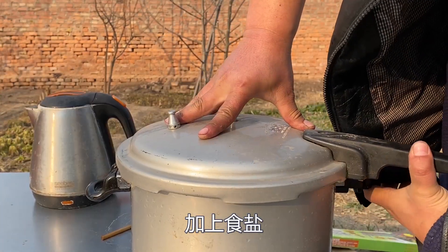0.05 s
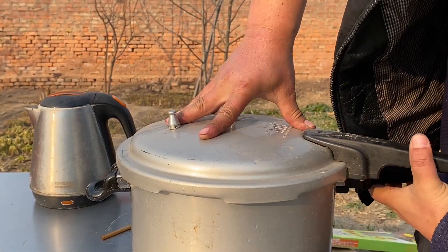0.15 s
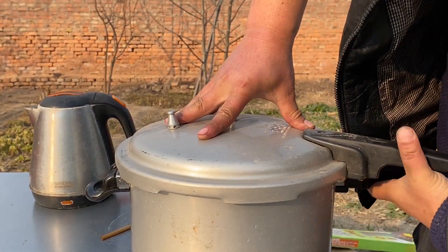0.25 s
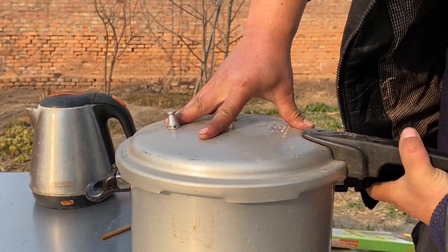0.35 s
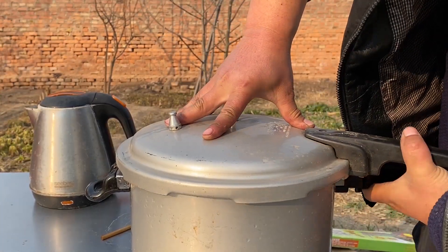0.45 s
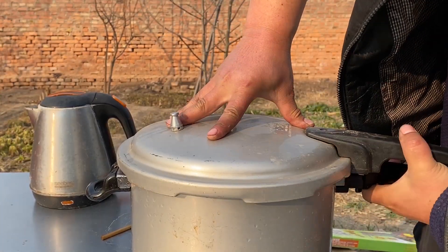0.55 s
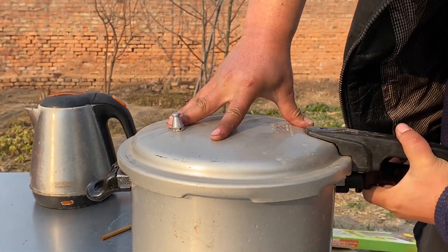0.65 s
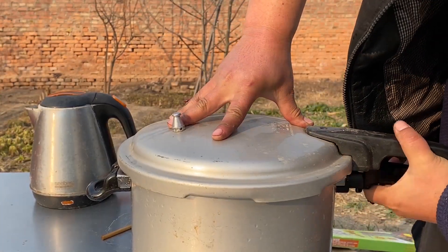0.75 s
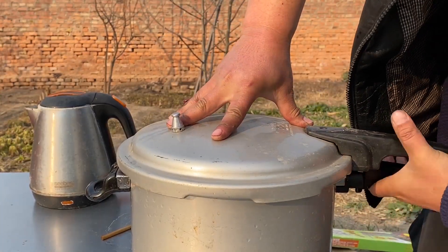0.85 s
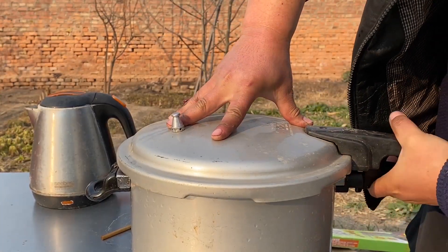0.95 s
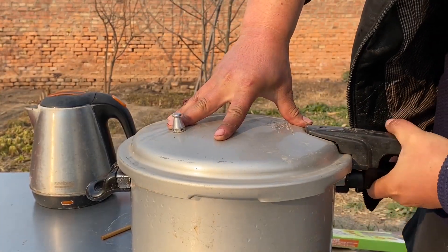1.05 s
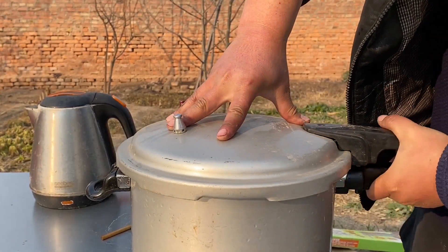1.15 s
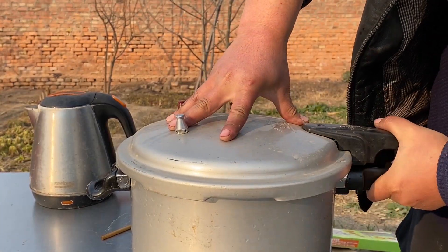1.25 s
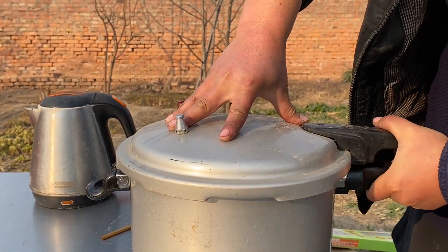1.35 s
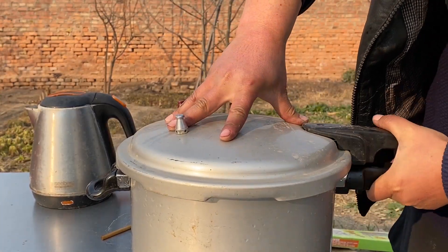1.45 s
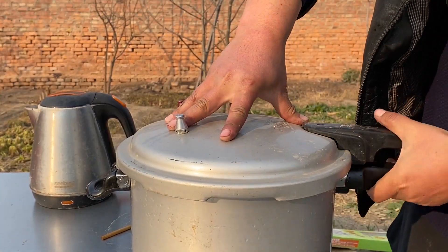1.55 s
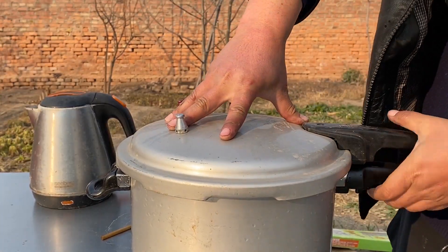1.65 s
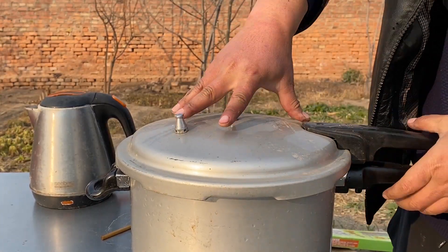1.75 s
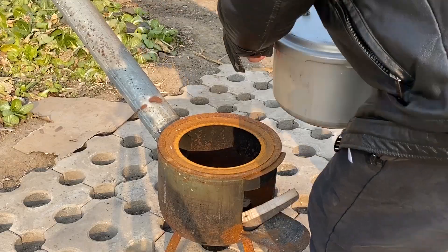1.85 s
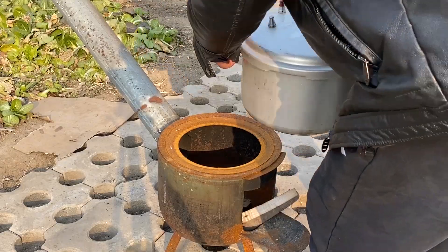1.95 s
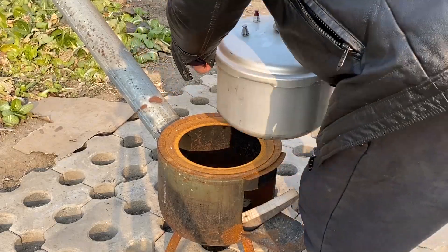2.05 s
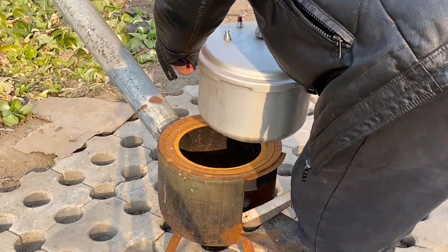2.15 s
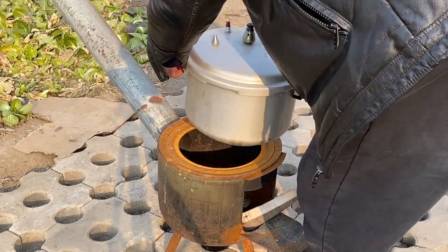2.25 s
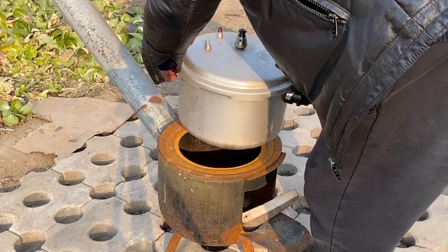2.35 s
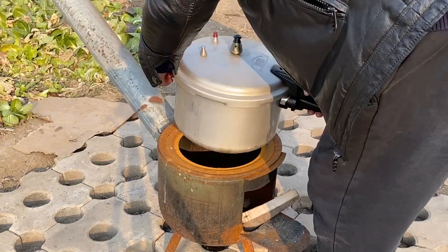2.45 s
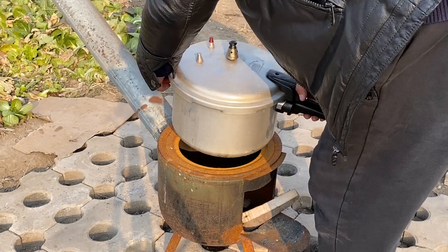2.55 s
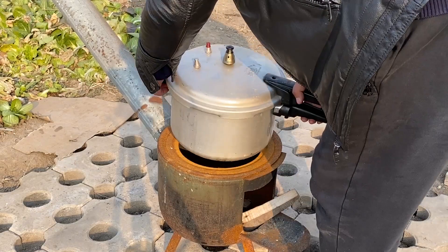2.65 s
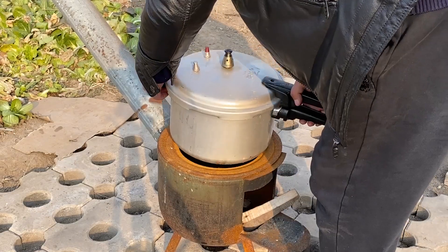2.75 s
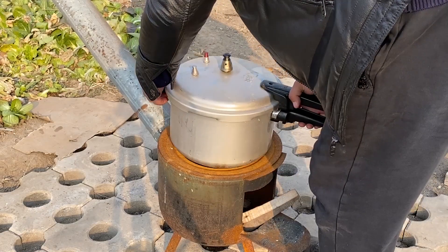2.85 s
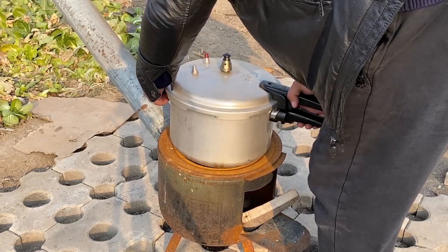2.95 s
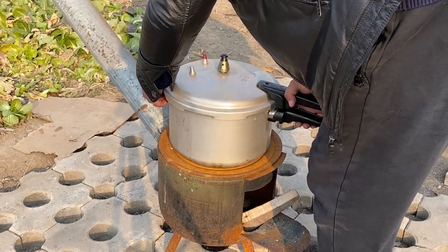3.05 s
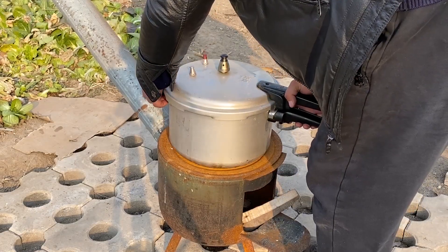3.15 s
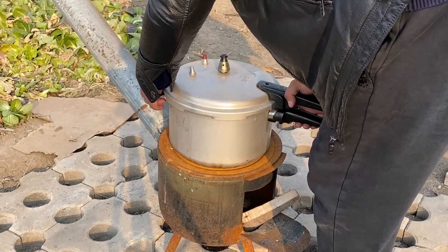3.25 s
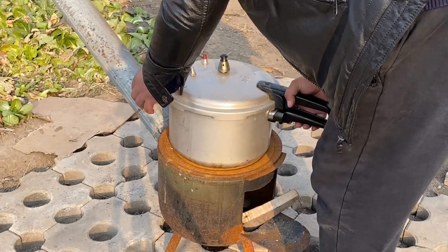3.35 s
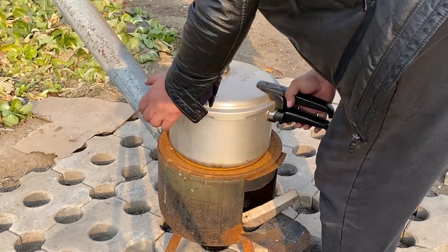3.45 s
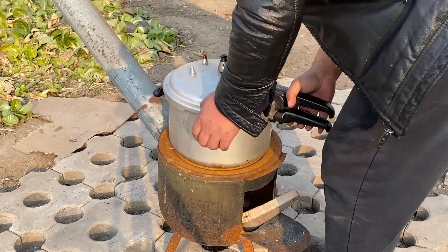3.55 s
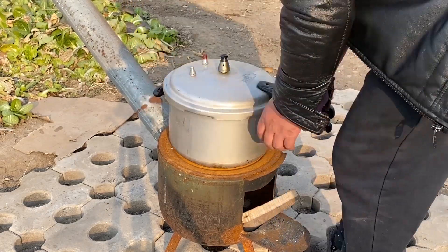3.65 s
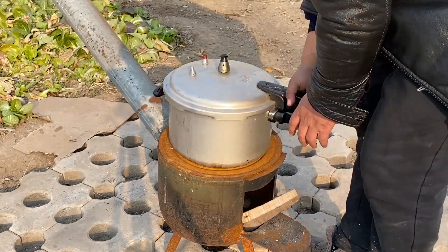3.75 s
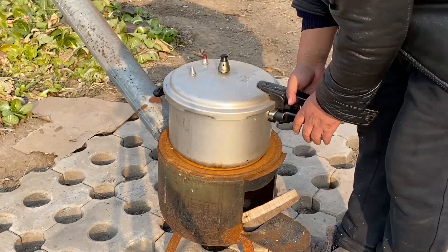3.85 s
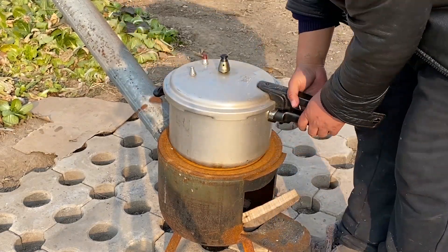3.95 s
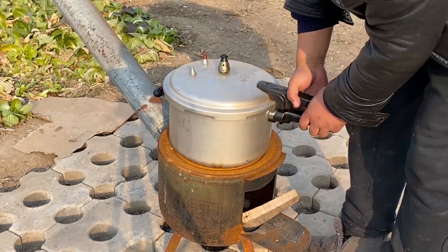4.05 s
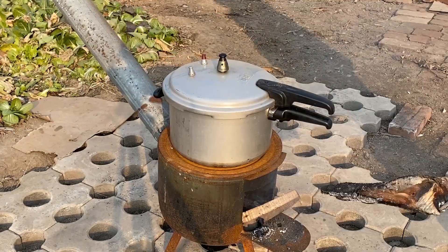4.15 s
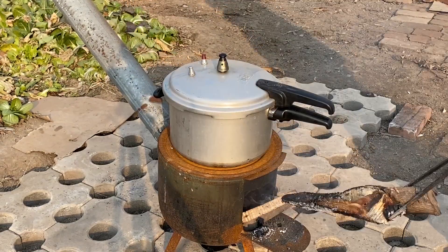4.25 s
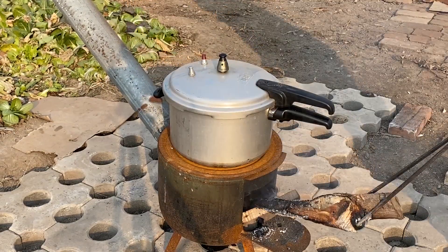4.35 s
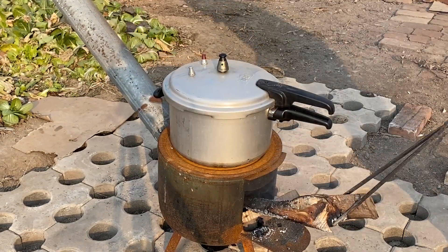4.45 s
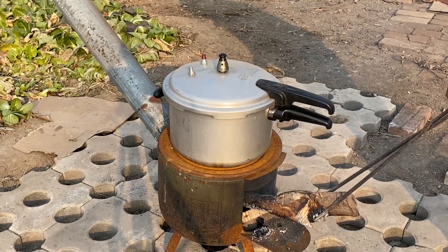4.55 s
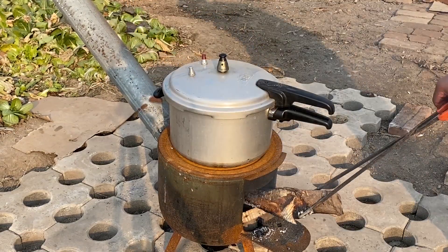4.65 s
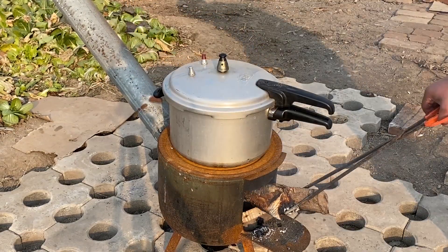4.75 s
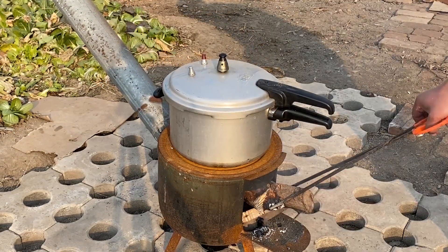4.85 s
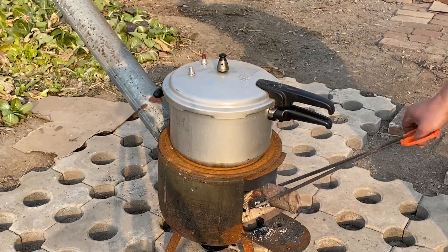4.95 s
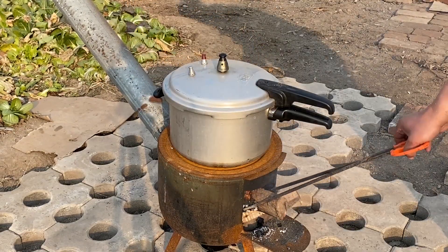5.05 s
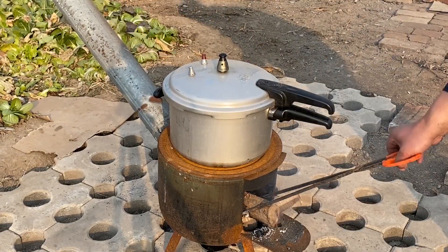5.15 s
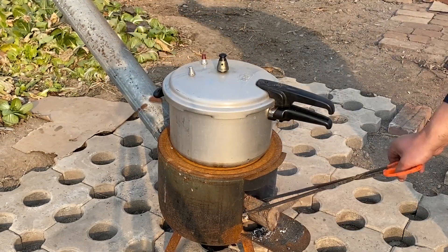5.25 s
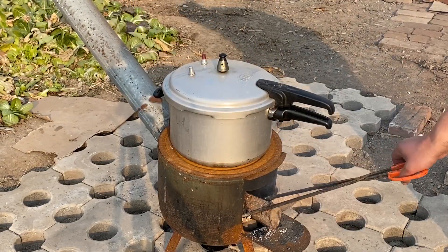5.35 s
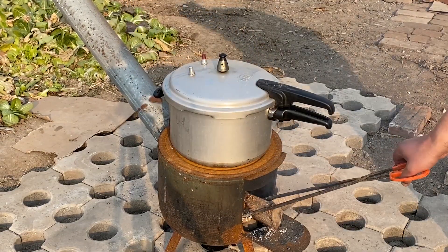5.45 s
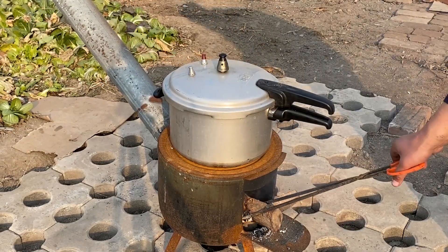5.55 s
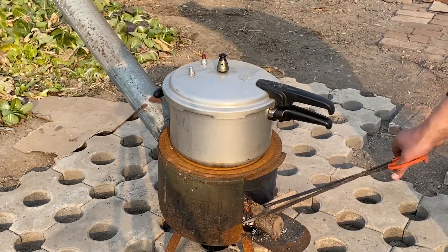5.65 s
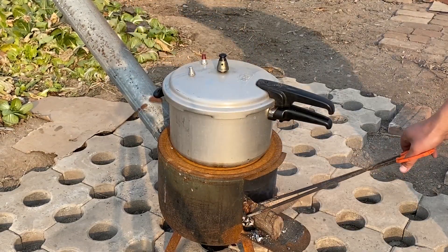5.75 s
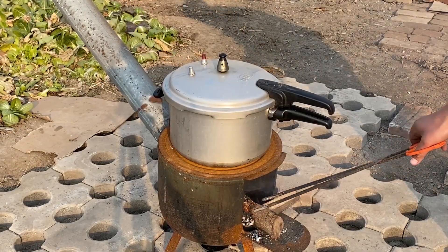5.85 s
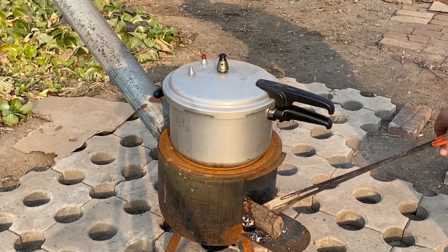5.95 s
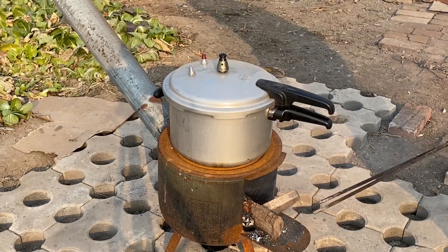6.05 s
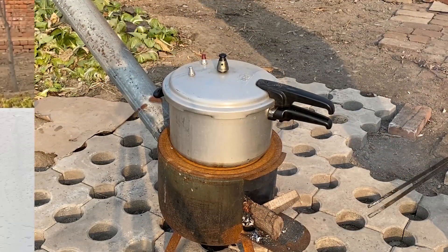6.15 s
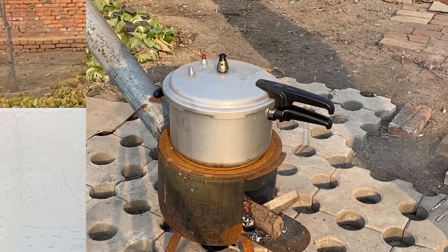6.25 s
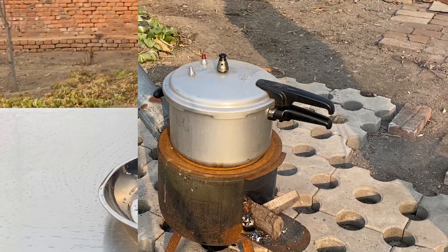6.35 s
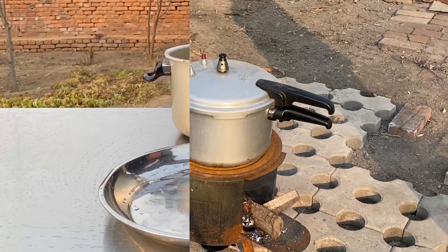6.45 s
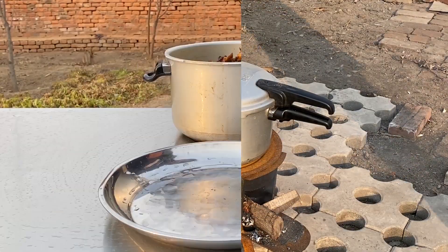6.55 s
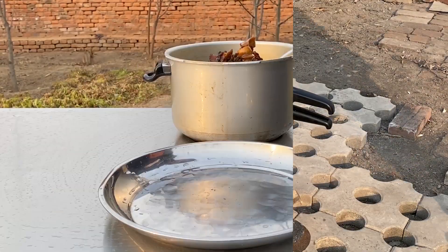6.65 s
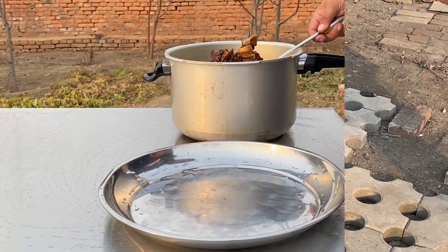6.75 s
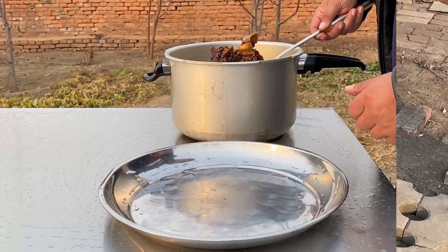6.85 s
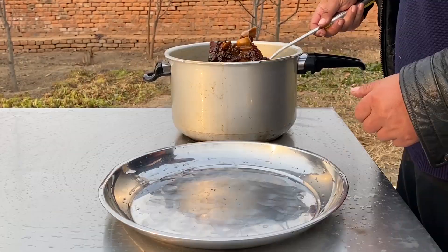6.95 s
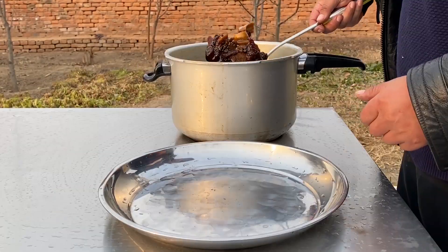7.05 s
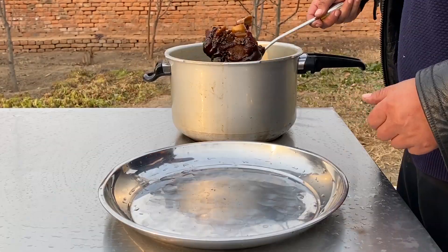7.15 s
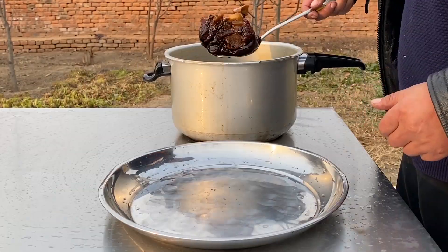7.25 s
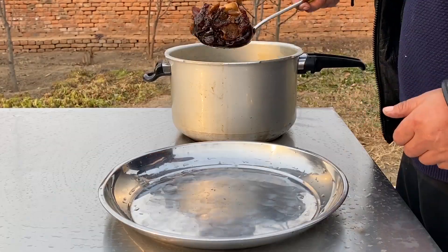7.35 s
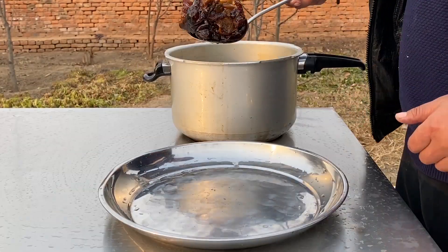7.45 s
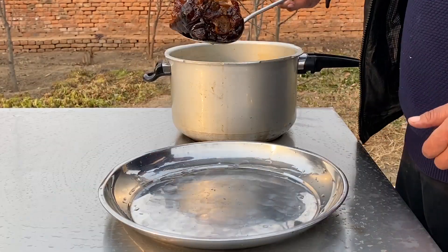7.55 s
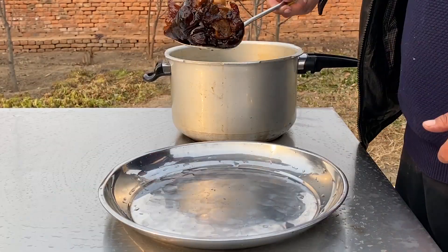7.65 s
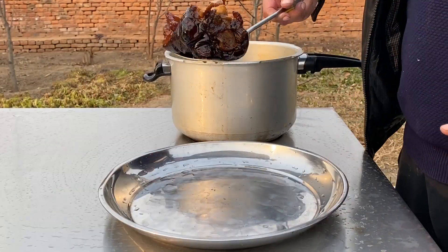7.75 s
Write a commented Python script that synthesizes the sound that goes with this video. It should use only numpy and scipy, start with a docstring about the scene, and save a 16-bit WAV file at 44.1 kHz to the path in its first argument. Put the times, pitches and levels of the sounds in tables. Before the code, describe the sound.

In a quiet yard, a cooker lid clanks shut, a pot thuds onto a stove, tongs scrape and ping, and a spoon lightly brushes the rim.

```python
"""A yard in light wind: coloured noise for hum and rumble, under the rustle of hands, sleeves and jacket.
A hand-damped pressure cooker lid is twisted until it locks with a clank: noise crack, thump and ringing modes.
The pot is carried over paving and set on an iron stove: damped knocks, gritty scrapes and sliding squeaks.
Iron tongs poke wood into the fire with decaying pings; the yard hum drops and a spoon brushes the pot rim."""
import sys
import numpy as np
from scipy import signal
from scipy.fft import rfft, irfft, next_fast_len
from scipy.io import wavfile
from scipy.ndimage import uniform_filter1d, map_coordinates

SR = 44100
rng = np.random.default_rng(int(sys.argv[2]) if len(sys.argv) > 2 else 0)


def log_audio(samples):
    """Write samples as a 16-bit WAV file to the path given in sys.argv[1]."""
    # one column per channel
    frames = np.atleast_2d(samples).T
    # limit to full scale, then quantise
    limited = np.clip(frames, -1, 1)
    pcm = np.round(limited * 32767).astype(np.int16)
    wavfile.write(sys.argv[1], SR, pcm)


N = 343098  # samples

# share by which scrape speed and spoon resonances vary
DRIFT = 0.0318


def undb(db):
    """Decibels to amplitude."""
    return 10 ** (np.asarray(db) / 20)


def unit(x):
    """Scales x to RMS 1."""
    return x / np.sqrt(np.mean(x ** 2))


def lowpass(x, hz):
    """Second-order low-pass."""
    return signal.sosfilt(signal.butter(2, hz, fs=SR, output="sos"), x)


def curve(rows):
    """Columns of a table joined by straight lines, one value per sample."""
    start_s, *columns = np.transpose(rows)
    return [np.interp(np.arange(N) / SR, start_s, column) for column in columns]


def colour(x, points):
    """Shapes the spectrum of x with (Hz, dB) points on a log-frequency axis."""
    hz, db = np.transpose(points)
    size = next_fast_len(len(x))
    bin_hz = np.arange(1, size // 2 + 2) * SR / size
    gain = undb(np.interp(np.log(bin_hz), np.log(hz), db))
    return irfft(rfft(x, size) * gain, size)[:len(x)]


def band(x, hz, width_hz):
    """One resonance, its pitch kept below SR / 2.5."""
    return signal.lfilter(*signal.iirpeak(min(hz, SR / 2.5), hz / width_hz, SR), x)


def fade(t60_s, size):
    """Exponential decay of 60 dB in t60_s, at least 5 ms."""
    return np.exp(-np.log(1000) * np.arange(size) / SR / max(t60_s, .005))


def ring(modes, size, scatter_db=0.):
    """Decaying sines; every blow lands elsewhere and shares its energy anew."""
    t = np.arange(size) / SR
    luck = rng.standard_normal(len(modes))
    out = np.zeros(size)
    for (hz, db, t60_s), r in zip(modes, luck):
        out += undb(db + scatter_db * r) * fade(t60_s, size) * np.sin(2 * np.pi * hz * t)
    return out


def grit(size, spread_db):
    """Dense slips of uneven size, the largest ones bounded."""
    boost = np.minimum(rng.exponential(size=size), 5)
    return unit(rng.standard_normal(size) * undb(spread_db * boost))


def walk(rate_hz):
    """Random levels held 1 / rate_hz, smoothed twice; RMS 1."""
    k = int(SR / rate_hz)
    steps = np.repeat(rng.standard_normal(N // k + 1), k)
    return unit(uniform_filter1d(uniform_filter1d(steps, k), k)[:N])


def metal(x, lo_hz, hi_hz, count):
    """Many narrow resonances at loosely even pitches: what makes rubbed metal sound unlike hiss."""
    places = (np.arange(count) + rng.random(count)) / count
    pitches = lo_hz * (hi_hz / lo_hz) ** places
    return unit(sum(band(x, hz, .03 * hz) for hz in pitches))


def add(out, start_s, x):
    """Mixes x into out from start_s."""
    i = int(start_s * SR)
    out[i:i + len(x)] += x[:N - i]


# yard spectrum, relative per Hz: pitch_hz, level_db
YARD_SPECTRUM = [(12, -29.5), (20, -1.5), (63, -0.5), (134, -4.5), (187, -7.5), (388, -8), (459, -13),
                 (574, -5.5), (718, -13.5), (1120, -12.5), (1480, -18.5), (4940, -34), (13500, -43.5),
                 (16000, -42)]
# slow push of air: start_s, level_db
WIND_LEVEL = [(0.0, -61), (1.4, -62), (2.7, -50), (4.1, -51), (4.27, -63.5), (7.78, -76.5)]
HUM_DB, RUMBLE_DB = -58, -61
QUIET_FROM_S, QUIET_HUM_CHANGE_DB, QUIET_RUMBLE_CHANGE_DB = 6.58, -5.5, -1


def yard():
    """Distant town hum, low rumble and wind: filtered noise, each with its own changing level."""
    quiet = np.clip((np.arange(N) / SR - QUIET_FROM_S) / .06 + .5, 0, 1)
    hum_db = HUM_DB + QUIET_HUM_CHANGE_DB * quiet
    rumble_db = RUMBLE_DB + QUIET_RUMBLE_CHANGE_DB * quiet
    air = colour(rng.standard_normal(N), YARD_SPECTRUM)
    low = lowpass(air, 140)
    hum = unit(air - low) * undb(.8 * walk(8))
    rumble = unit(low) * undb(1.5 * walk(5))
    wind_band = signal.butter(2, [2.5, 14], "band", fs=SR, output="sos")
    wind = unit(signal.sosfilt(wind_band, rng.standard_normal(N)))
    return undb(hum_db) * hum + undb(rumble_db) * rumble + undb(curve(WIND_LEVEL)[0]) * wind


# fine hiss of cloth, relative per Hz: pitch_hz, level_db
RUB_SPECTRUM = [(2350, -28), (4000, -0.5), (8260, -4), (10400, -16.5), (13400, -12), (16000, -22.5)]
# hands and sleeves working at lid and handles: start_s, level_db
HAND_RUBS = [(0, -68.5), (.1, -68.5), (.258, -70.5), (.27, -60), (.33, -65.5), (.5, -61.5), (.68, -59),
             (.73, -73), (.87, -68), (.92, -85), (1.02, -63.5), (1.22, -59), (1.3, -79), (1.48, -86),
             (1.55, -68.5), (1.77, -69), (1.95, -77.5), (2.0, -100)]
# single swelling rubs of cloth and wood: start_s, length_s, fine_db, coarse_db
SINGLE_RUBS = [(0.583, 0.025, -78, -60), (1.966, 0.14, -67.5, -73), (3.544, 0.064, -64.5, -60),
               (3.922, 0.25, -60.5, -56), (3.995, 0.073, -68, -56), (4.289, 0.054, -66.5, -73),
               (4.361, 0.024, -66.5, -79), (4.598, 0.098, -70.5, -82), (5.429, 0.11, -65, -60.5),
               (5.616, 0.26, -73.5, -68), (5.94, 0.11, -74, -64.5), (6.534, 0.058, -69, -71)]
# small bright ticks of zip, valve and embers: start_s, level_db, pitch_hz
BRIGHT_TICKS = [(0.155, -31.5, 1530), (0.762, -38, 1370), (0.8616, -42, 1730), (1.7657, -37.5, 2350),
                (3.0706, -37.5, 4950), (3.9684, -42, 2000), (4.0318, -39, 2400), (4.331, -47, 3470),
                (6.3447, -48, 5900)]
HAND_CREAK_DB = 1  # over the fine hiss


def rustle():
    """A fine hiss of fibres over a coarser creak, both flickering with the slips; ticks in between."""
    # folds that let go one by one, about 70 per second
    catches = (rng.random(N) < 70 / SR) * rng.standard_normal(N) * undb(21)
    slips = grit(N, 2) * undb(1.5 * walk(70) + 1.5 * walk(20)) + catches
    fine = unit(unit(colour(slips, RUB_SPECTRUM)) + undb(-5) * metal(slips, 4300, 9300, count=16))
    broad_creak = unit(band(band(slips, 2300, 2200), 2300, 2200))
    coarse = unit(broad_creak + metal(slips, 1500, 3900, count=11))
    out = undb(curve(HAND_RUBS)[0]) * (fine + undb(HAND_CREAK_DB) * coarse)
    for start_s, length_s, fine_db, coarse_db in SINGLE_RUBS:
        part = slice(int(start_s * SR), int((start_s + length_s) * SR))
        swell = signal.windows.tukey(int(length_s * SR) + 2, .85)[:len(fine[part])]
        add(out, start_s, swell * (undb(fine_db) * fine[part] + undb(coarse_db) * coarse[part]))
    size = SR // 20
    for start_s, level_db, pitch_hz in BRIGHT_TICKS:
        snap = rng.standard_normal(size) * fade(.014, size)
        tick = band(snap, pitch_hz, .5 * pitch_hz) + undb(-14.5) * band(snap, 6500, 5100)
        add(out, start_s, undb(level_db) * tick)
    return out


# leather and rough contact dragged at changing speed: start_s, length_s, level_db, from_hz, to_hz
SLIDING_NOTES = [(1.509, 0.167, -68.5, 3900, 3750), (2.985, 0.036, -61, 7200, 5200),
                 (3.962, 0.127, -54, 1850, 1950), (4.019, .1, -59, 4080, 2880),
                 (4.318, .035, -53.5, 230, 1030)]
SQUEAK_WIDTH = .12  # over mean pitch


def squeaks():
    """Uneven slips, smoothed to a narrow band, modulate a sine that slides in pitch under a swell."""
    out = np.zeros(N)
    for start_s, length_s, level_db, from_hz, to_hz in SLIDING_NOTES:
        size = int(length_s * SR)
        hz = np.geomspace(from_hz, to_hz, size)
        smoothing = max(int(SR / (SQUEAK_WIDTH * hz.mean())), 1)
        slips = uniform_filter1d(grit(size, 3), smoothing)
        note = unit(slips * np.sin(2 * np.pi * np.cumsum(hz) / SR))
        add(out, start_s, undb(level_db) * note * np.hanning(size))
    return out


# rim resonances, relative: pitch_hz, level_db
RIM_MODES = [(1100, -0.5), (1600, -3), (2150, -1), (2620, -2), (3170, -1.5), (3600, -2), (4280, -2.5),
             (6100, -5), (6660, -8), (7730, -2.5), (8440, -11)]
# spoon strokes on the open pot: start_s, rise_s, t60_s, level_db
SPOON_STROKES = [(7.606, .001, 0.025, -44.5), (7.612, .004, 0.13, -54), (7.639, 0.037, 0.45, -62),
                 (7.722, 0.011, 0.075, -54), (7.736, 0.0026, 0.1, -57.5)]
RIM_WIDTH = 0.047  # over pitch


def spoon():
    """A tap and a light drag: fading slips ring the same rim resonances over a little hiss."""
    out, size = np.zeros(N), SR // 4
    t = np.arange(size) / SR
    for start_s, rise_s, t60_s, level_db in SPOON_STROKES:
        slips = grit(size, 2.06) * np.minimum(t / max(rise_s, .0003), 1) * fade(t60_s, size)
        luck = rng.standard_normal((len(RIM_MODES), 2))
        rim = np.zeros(size)
        for (hz, mode_db), (r, q) in zip(RIM_MODES, luck):
            rim += undb(mode_db + 2.7 * r) * band(slips, hz * (1 + DRIFT * q), RIM_WIDTH * hz)
        add(out, start_s, undb(level_db) * (4 * rim + band(slips, 3000, 4500)))
    return out


# modes of the iron rods, relative: pitch_hz, level_db, t60_s
TONG_MODES = [(1308, -15, .35), (1700, -25, .3), (2417, -19, .25), (2724, -13, .3), (3068, -22, .3),
              (4307, -23, .08), (5835, -20, .1), (7010, -23, .1)]
# taps, with the mode favoured by the spot struck: start_s, level_db, spot_hz
TONG_TAPS = [(5.664, -37, 2720), (5.728, -36, 1600), (5.726, -37, 6500)]


def tongs():
    """Iron rods ping on the stove mouth, mostly near the favoured mode; the grip damps high modes first."""
    out = np.zeros(N)
    for start_s, level_db, spot_hz in TONG_TAPS:
        # 8 dB less per octave away from the favoured mode
        modes = [(hz, mode_db - 8 * abs(np.log2(hz / spot_hz)), t60_s) for hz, mode_db, t60_s in TONG_MODES]
        add(out, start_s, undb(level_db) * ring(modes, SR // 2, 1.3))
    return out


# metal dragged over iron and stone: start_s, hold_s, level_db, pitch_hz, hiss_db
METAL_DRAGS = [(2.84, 0.01, -41.5, 2500, -8), (2.874, 0.12, -60.5, 1690, -6.5),
               (3.027, 0.019, -40, 1750, -34), (3.751, 0.018, -35.5, 2330, -15.5),
               (4.993, 0.026, -56, 3440, -9), (5.089, 0.012, -54.5, 2380, -7),
               (5.134, 0.027, -51, 3080, -6), (5.16, 0.013, -44, 2790, -18),
               (5.189, 0.022, -49.5, 2290, -8), (5.273, 0.14, -51, 2260, -12),
               (5.531, 0.01, -48, 2420, -5.5), (5.594, 0.043, -50.5, 2220, -8.5),
               (5.634, 0.022, -48, 2260, -13)]
# a longer drag starts slower and has a narrower resonance
SHORT_WIDTH, SETTLE_S = 0.75, 0.027  # width over pitch, hold that halves it
SAG_DB, RISE_SHARE = -3, 0.28  # level change over the hold, rise over hold


def scrapes():
    """Stick-slip grit in the metal: quick rise, uneven sagging hold, fading tail."""
    out, size = np.zeros(N), SR // 4
    t = np.arange(size) / SR
    for start_s, hold_s, level_db, hz, hiss_db in METAL_DRAGS:
        width_hz = SHORT_WIDTH * hz / (1 + hold_s / SETTLE_S)
        unevenness = unit(uniform_filter1d(rng.standard_normal(size), 250))
        slips = grit(size, 3) * undb(2.3 * unevenness)
        tone = unit(band(band(slips, hz, width_hz), hz, width_hz))
        tone += undb(-7.5) * unit(band(slips, 1180, 840))
        tone += undb(-7.5) * unit(band(slips, 180, 66))
        sheen = unit(band(metal(slips, 806, 5640, count=26), 1770, 5100))
        tone = unit(tone) + undb(-1.5) * sheen
        # time-warp: resonances wander as the contact moves
        wander = 1 + DRIFT * unit(uniform_filter1d(rng.standard_normal(size), 900))
        tone = map_coordinates(tone, [np.cumsum(wander)], order=1, mode="mirror")
        # the drier the contact, the higher the hiss reaches
        top_db = -2 + 0.23 * min(hiss_db, -3)
        hiss = unit(band(band(slips, 8700, 4100), 8700, 4100))
        hiss += undb(top_db) * unit(band(slips, 14600, 5000))
        after = np.maximum(t - hold_s, 0)
        rise = np.minimum(t / (0.00077 + RISE_SHARE * hold_s), 1)
        sag = undb(SAG_DB * np.minimum(t / hold_s, 1))
        tail = 1.04 * np.exp(-after / 0.0096) + 0.19 * np.exp(-after / 0.041)
        add(out, start_s, undb(level_db) * (unit(tone) + undb(hiss_db) * hiss) * rise * sag * tail)
    return out


# dull knocks of pot, feet and wood: start_s, level_db, body_hz, click_db (over level_db), click_hz
DULL_KNOCKS = [(1.085, -37.5, 300, -0.5, 2300), (1.355, -37.5, 165, -30, 1300),
               (1.425, -41, 190, -30, 1300), (1.501, -40.5, 220, -5, 1260), (1.984, -23.5, 494, -40, 1300),
               (2.001, -31.5, 360, -36, 1300), (2.087, -34.5, 345, -25, 1870), (2.116, -28, 426, -2, 1950),
               (2.841, -35.5, 610, 0.5, 2510), (2.848, -36, 950, 1, 2120), (2.855, -29.5, 300, -6, 1124),
               (2.975, -36.5, 195, 0.5, 1654), (3.027, -29, 250, -3.5, 1910), (3.034, -35, 695, 1.5, 1320),
               (3.043, -28, 910, 1.5, 2120), (3.743, -22.5, 410, -30, 2000), (3.78, -32, 343, -2, 3390),
               (4.147, -29.5, 944, 5.5, 1890), (4.573, -39, 480, -35, 1750), (4.606, -43, 199.5, -27, 1500),
               (4.642, -42.5, 330, -30, 1500), (4.999, -36, 239, -12, 3390), (5.091, -38.5, 935, -11, 2320),
               (5.161, -43.5, 800, 6, 1710), (5.971, -52, 378, 11.5, 1750), (6.001, -55.5, 630, 11, 2220),
               (6.301, -52, 600, 7.5, 1410), (6.482, -46, 550, -25, 1480)]
# while pot or tongs meet the stove: from_s, to_s
IRON_SPANS = [(2.8, 3.04), (5.05, 5.6)]
CONTACT_S = .0018  # delay of a knock after its start_s
# base decays, scaled per part; off the iron a higher body dies sooner
DULL_BASE_S, IRON_BASE_S, REFERENCE_HZ = .058, 0.17, 400


def knocks():
    """A damped body tone with a noisy tail and a quicker click on top, dulled by the soft contact."""
    out, size = np.zeros(N), SR // 4
    t = np.arange(size) / SR
    for start_s, level_db, hz, click_db, click_hz in DULL_KNOCKS:
        on_iron = any(from_s < start_s < to_s for from_s, to_s in IRON_SPANS)
        base_s = IRON_BASE_S if on_iron else DULL_BASE_S * np.sqrt(REFERENCE_HZ / hz)
        # the body swings wider on the rebound
        push = np.minimum(.45 + 1.4 * hz * t, 1.5)
        body = push * ring([(hz, -1.5, 0.31 * base_s), (1.6 * hz, -9, 0.42 * base_s)], size)
        tail = unit(band(rng.standard_normal(size), hz, 0.48 * hz)) * fade(2.1 * base_s, size)
        click_modes = [(click_hz, 0, max(.2 * base_s, .022)),
                       (1.45 * click_hz, -4, .14 * base_s),
                       (1.85 * click_hz, -7, .1 * base_s)]
        click = ring(click_modes, size, 2)
        rattle = metal(grit(size, 3), 0.8 * click_hz, 1.4 * click_hz, count=8) * fade(0.74 * base_s, size)
        knock = body + undb(-14) * tail + undb(click_db) * (click + undb(-14) * rattle)
        add(out, start_s + CONTACT_S, undb(level_db) * knock)
    return lowpass(out, 6000)


# blows of the locking lid, rebounds included: start_s, crack_db, thump_db
LID_BLOWS = [(1.1065, -28, -30), (1.1228, -33, -27), (1.2281, -9.5, -12), (1.2305, -11, -1),
             (1.2365, -16, -22)]
# lid modes, relative: pitch_hz, level_db, t60_s
LID_MODES = [(165, -12, .6), (210, -9, .7), (301, -8, .28), (425, -11, .3), (505, -10, .2), (688, -10, .15),
             (789, -9, .33), (794, -11, .33), (1604, 0, .17), (1836, -15, .25), (2266, -12, .12),
             (2998, -23, .35), (3225, -17, .16), (3445, -17, .18), (4086, -8, .08)]
# air and food in the pot, relative: pitch_hz, level_db, t60_s
THUMP_MODES = [(250, -3, 0.019), (162, -17.5, 0.048), (370, -12, .03), (445, -9, 0.051), (542, -6, .022),
               (770, -14.5, 0.016), (920, -12.5, 0.024), (1090, -15, 0.018)]
# crack along the rim, relative per Hz: pitch_hz, level_db
CRACK_SPECTRUM = [(410, -32.5), (700, 0), (1440, -9.5), (2590, -4), (4800, -14.5), (6650, -15),
                  (11400, -31), (14400, -34.5), (16000, -43.5)]
# pot and table top, too many modes to tell apart, relative per Hz: pitch_hz, level_db
SHUDDER_SPECTRUM = [(60, -25), (130, -3), (450, 0.5), (1100, -11.5), (3200, -19.5), (8000, -30.5),
                    (16000, -52.5)]
RING_DB, CRACK_T60_S = -24, .042  # ring is relative to the thump
PUSH_S, PUSH_DB = 0.0013, -4.5  # one shove of air as each blow starts


def lid():
    """Each blow cracks along the rim, thumps the shut-in air, rings the lid and shakes the pot."""
    out, size = np.zeros(N), SR // 2
    t = np.arange(size) / SR
    way = 1  # rebounds push in turn inward and outward
    for start_s, crack_db, thump_db in LID_BLOWS:
        crack = unit(colour(grit(size, 0.73), CRACK_SPECTRUM)) * fade(CRACK_T60_S, size)
        dying = fade(0.091, size) + undb(-13) * fade(.4, size)
        shudder = unit(colour(rng.standard_normal(size), SHUDDER_SPECTRUM)) * dying
        push = undb(PUSH_DB) * np.sin(np.pi * np.minimum(t / PUSH_S, 1))
        thump = way * (push + ring(THUMP_MODES, size))
        ringing = ring(LID_MODES, size, 1.4) + undb(4.5) * shudder
        add(out, start_s, undb(thump_db) * (thump + undb(RING_DB) * ringing) + undb(crack_db) * crack)
        way = -way
    # keeps deep bass out of the clank
    return signal.sosfilt(signal.butter(2, 140, "high", fs=SR, output="sos"), out)


def scene():
    """Sum of all layers, one channel."""
    background = yard() + rustle() + squeaks()
    handling = spoon() + tongs() + scrapes() + knocks()
    return (background + handling + lid())[None]


TOP_HZ = 15850


def record(dry):
    """Clips at full scale, then cuts everything above TOP_HZ."""
    top_cut = signal.ellip(10, .2, 80, TOP_HZ, fs=SR, output="sos")
    return signal.sosfilt(top_cut, np.clip(dry, -1, 1))


dry = scene()
out = record(dry)
log_audio(out)
```